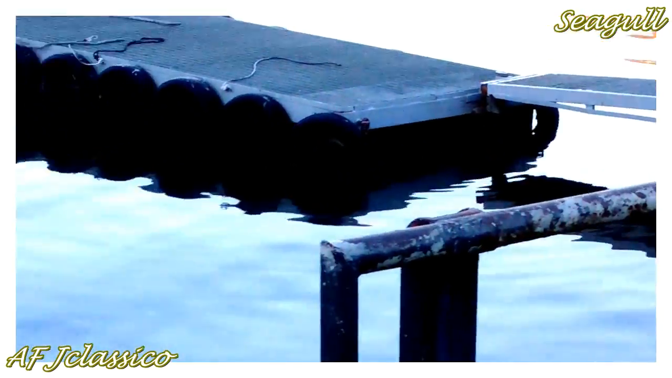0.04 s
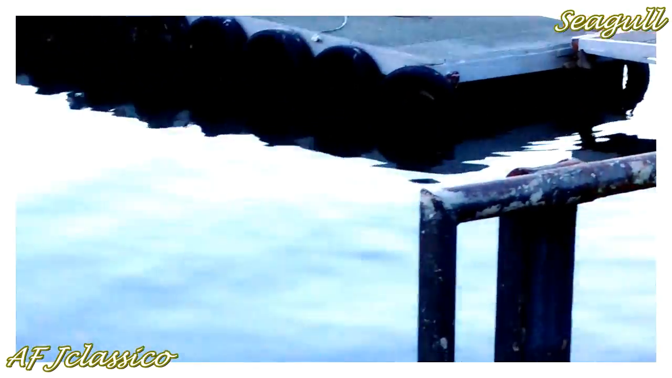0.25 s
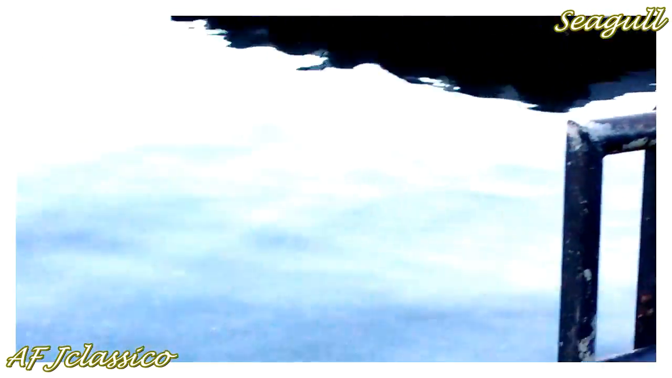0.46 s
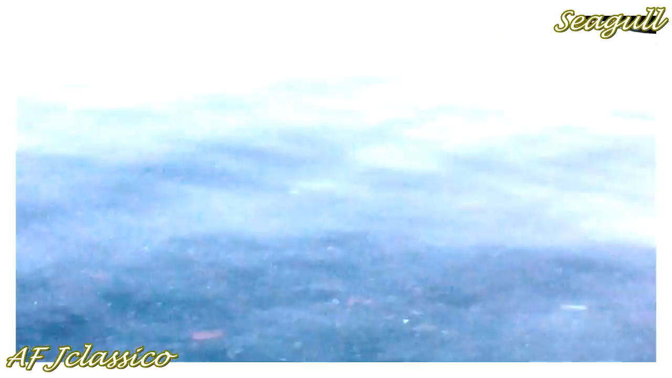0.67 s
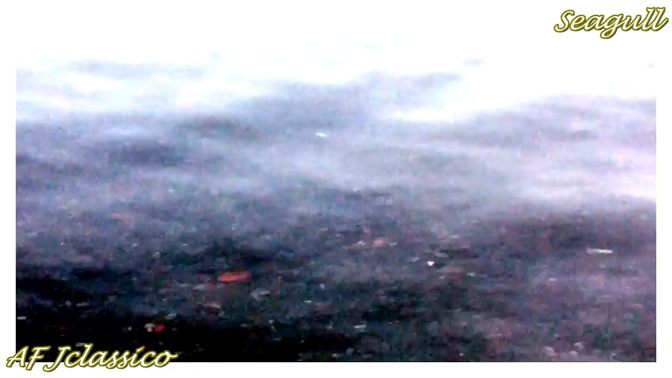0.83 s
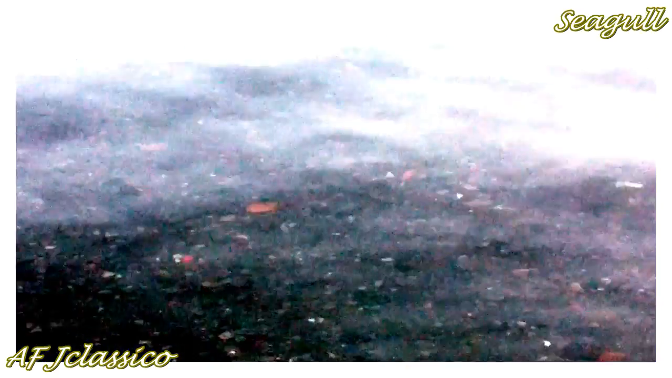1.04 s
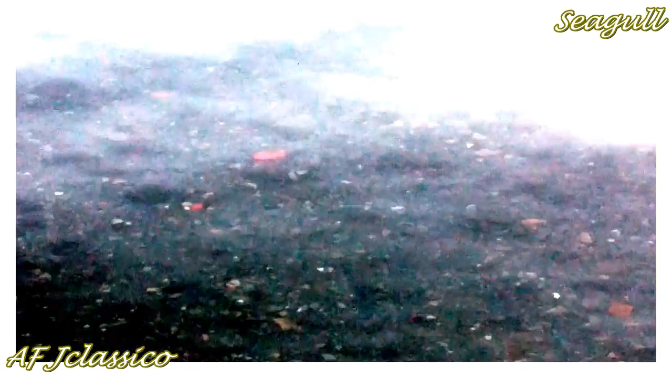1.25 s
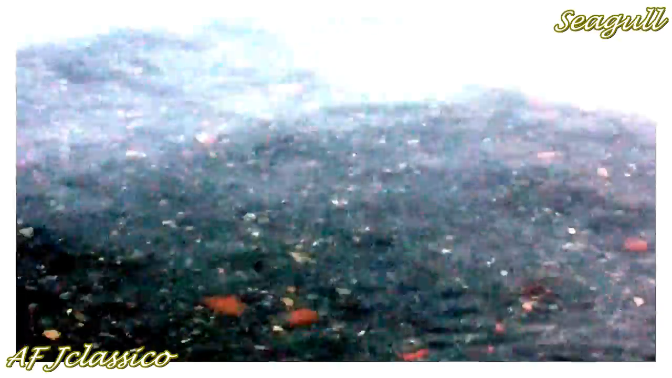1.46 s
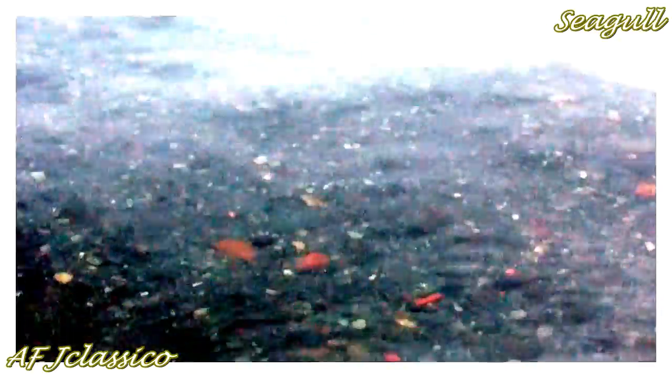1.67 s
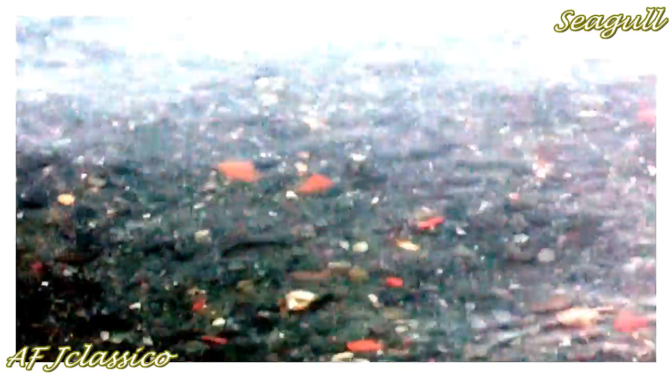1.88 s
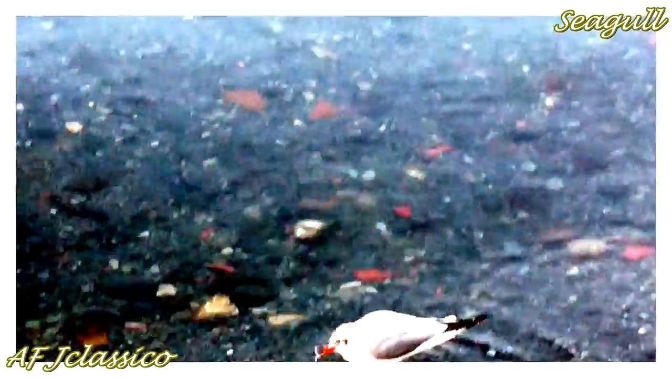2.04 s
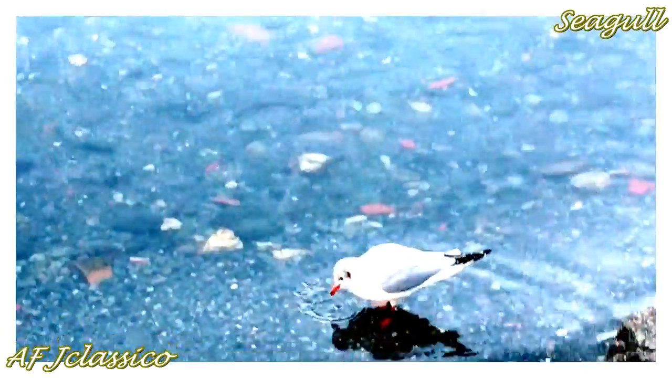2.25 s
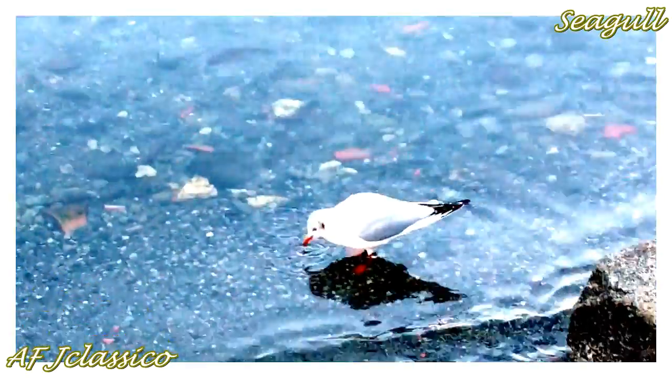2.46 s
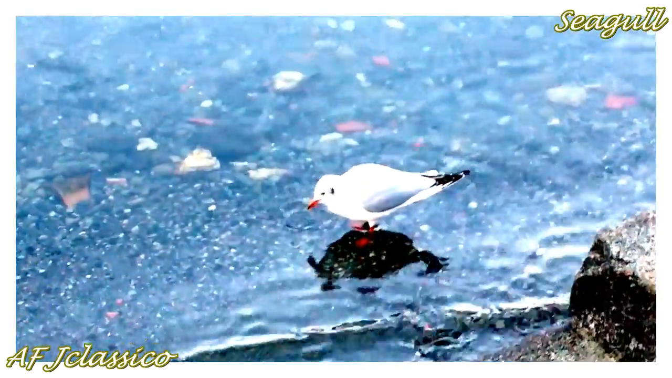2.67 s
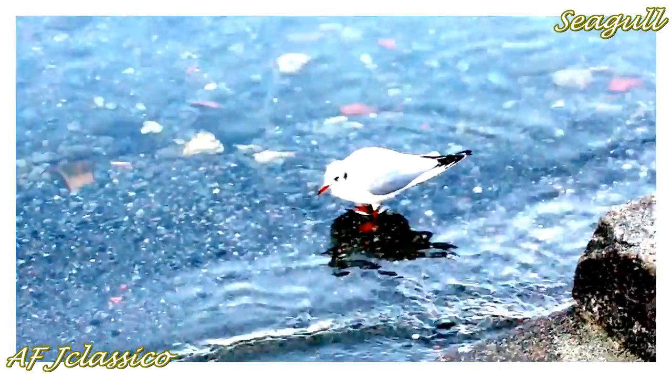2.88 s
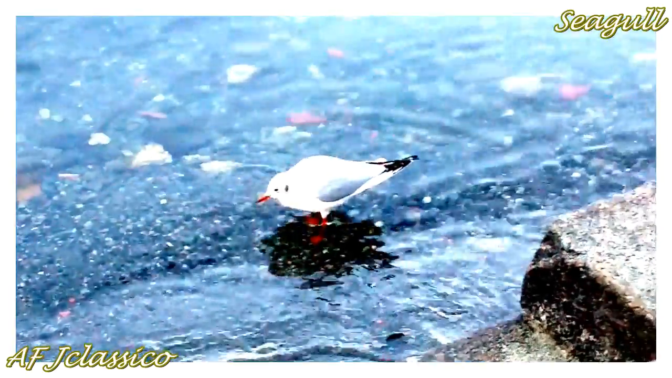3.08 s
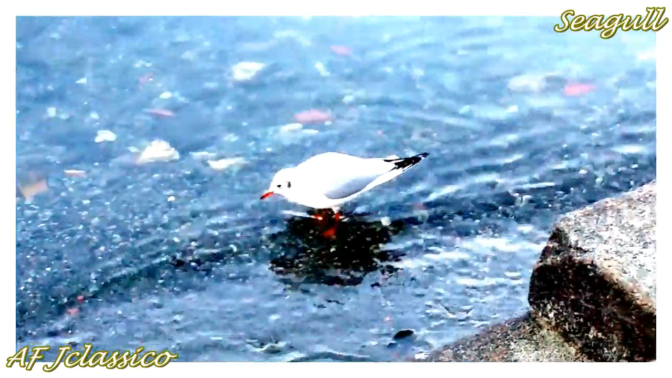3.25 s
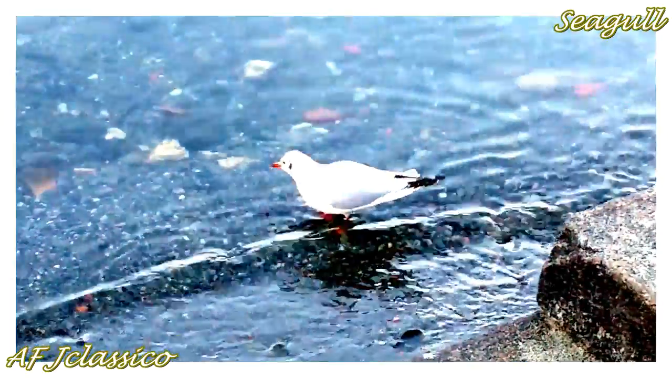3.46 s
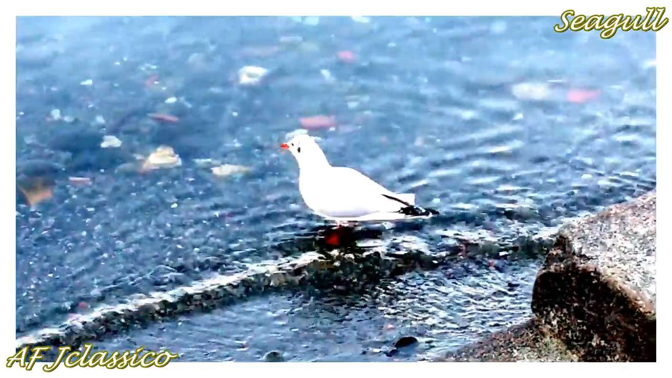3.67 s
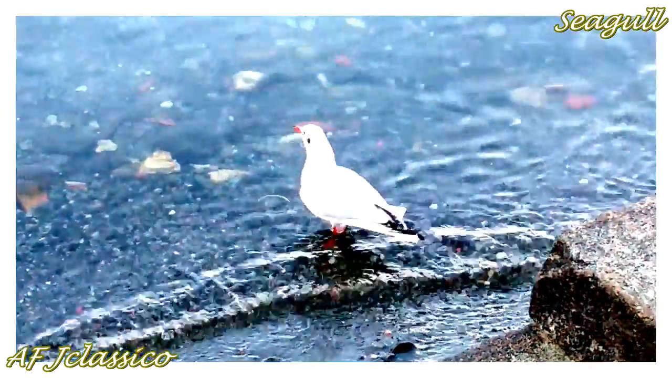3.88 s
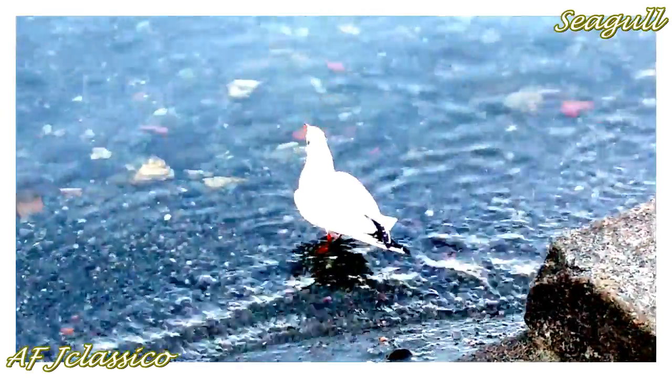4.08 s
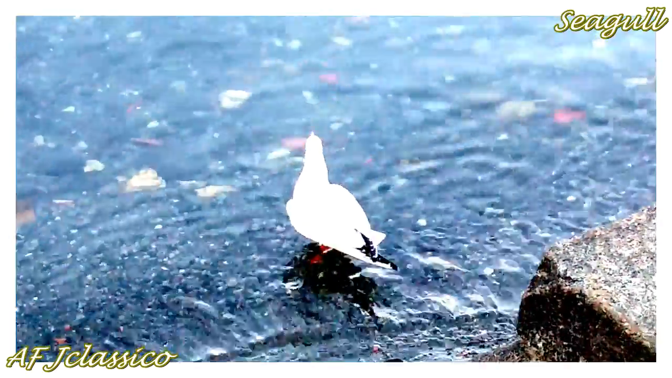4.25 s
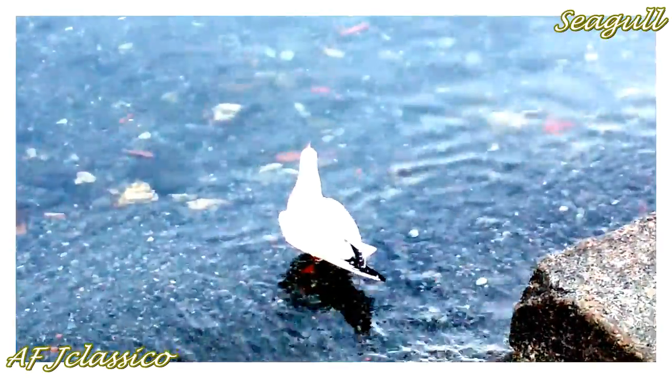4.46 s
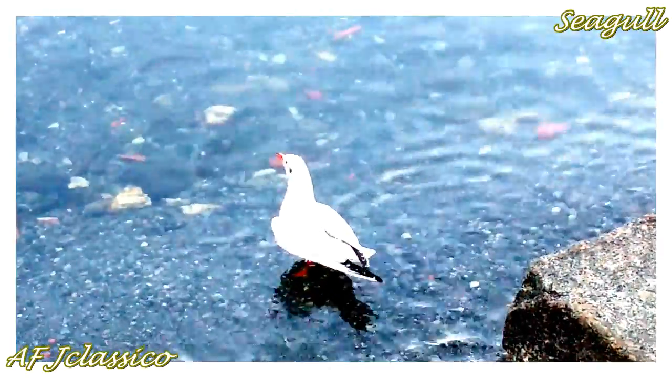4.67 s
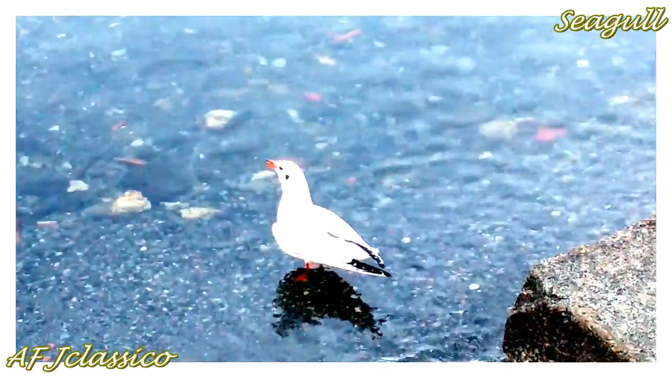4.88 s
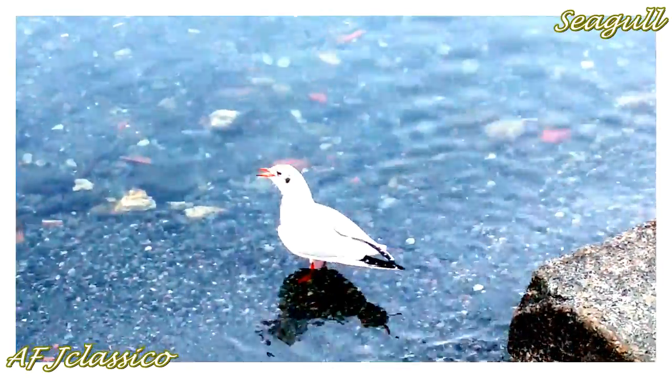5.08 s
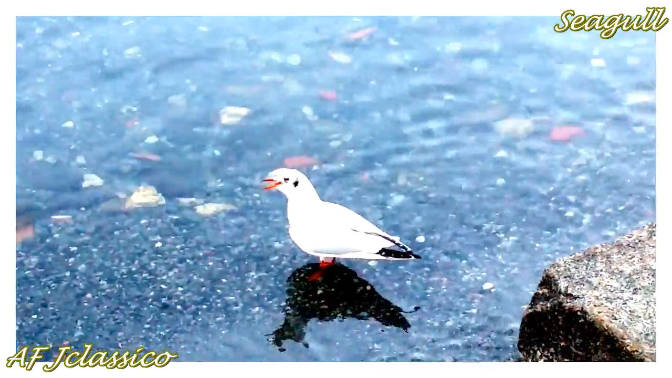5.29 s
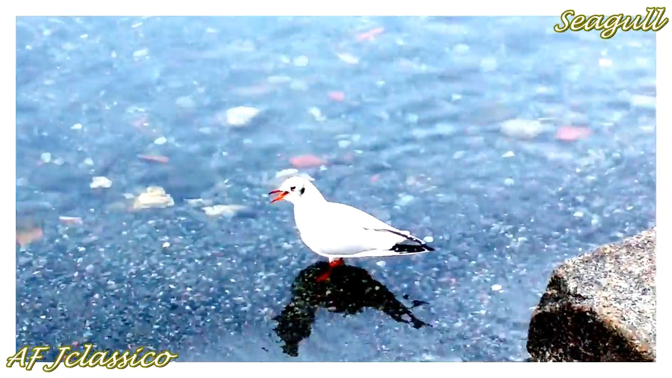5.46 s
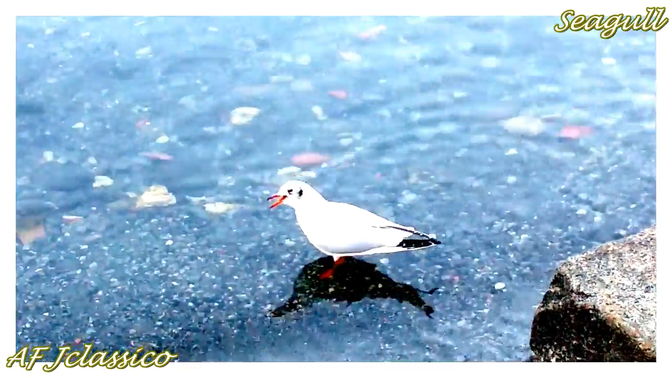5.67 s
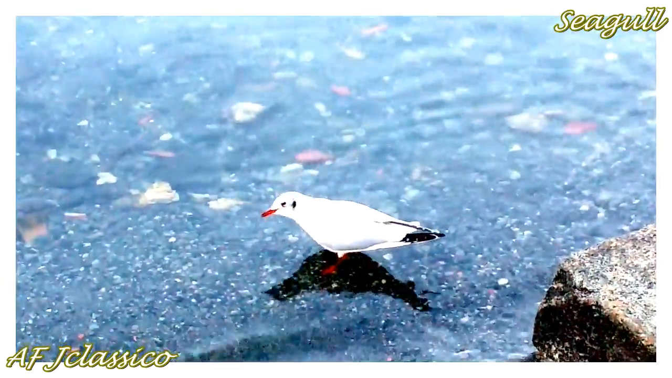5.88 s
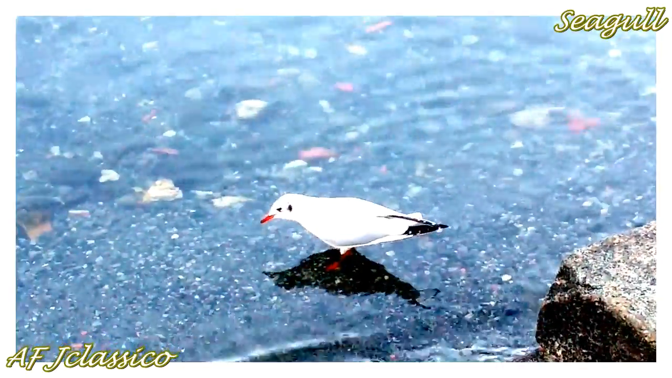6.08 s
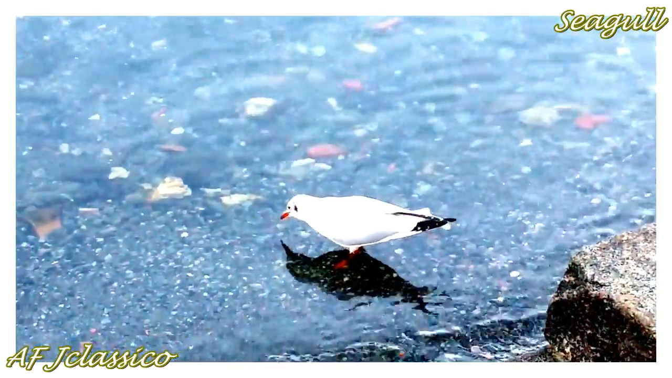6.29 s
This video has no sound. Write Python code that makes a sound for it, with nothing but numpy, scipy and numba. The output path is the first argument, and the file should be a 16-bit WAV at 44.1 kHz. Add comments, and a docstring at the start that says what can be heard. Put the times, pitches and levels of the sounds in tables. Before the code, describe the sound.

Water ticks softly on stones under a steady rush, then nearby gulls scold in a run of hoarse screeches.

```python
"""A steady rush from the far shore of a lake comes first, with water ticking and fizzing on the stones.
Then black-headed gulls scold in the shallows, close by on the right.
Each call is a rattle of about 45-105 short, hoarse bursts a second: a membrane buzzes in the voice box,
the throat rings with it, and the bill opens for the screeches.
Stones and ripples scatter the calls, and the bank answers faintly."""
import sys
import numpy as np
from scipy import signal
from scipy.fft import rfft, irfft, next_fast_len
from scipy.io import wavfile
from scipy.ndimage import uniform_filter1d
from numba import njit

SR = 44100
rng = np.random.default_rng(int(sys.argv[2]) if len(sys.argv) > 2 else 0)


def file_out(sig):
    """Save sig as 16-bit WAV at sys.argv[1]."""
    # one column per channel
    cols = np.atleast_2d(sig).T
    # limit, then scale
    lim = np.clip(cols, -1, 1)
    pcm = np.round(lim * 32767).astype(np.int16)
    wavfile.write(sys.argv[1], SR, pcm)


N = 279153

# how strong the rush is from bass to treble: f/Hz, relative level/dB
RUSH_SPECTRUM = [(13, -49), (22, -25), (58, -1.5), (68, -11), (76, 2), (86, -3), (211, -6), (242, -7.5),
                 (278, -7.5), (432, -14.5), (585, -12.5), (988, -13.5), (1300, -21), (2020, -23.5),
                 (4140, -36), (9220, -41), (16000, -41.5)]
# how alike the rush is on the left and right: f/Hz, likeness/0-1
RUSH_ALIKE = [(60, .995), (130, .985), (290, .92), (640, .75), (1400, .45), (2800, 0)]
# which side the rush leans to: f/Hz, left minus right level/dB
RUSH_BALANCE = [(60, 0.5), (180, -1.5), (550, -0.5), (1650, -5.5), (4970, 0), (15000, -1.5)]
# drops ticking on stones: t/s, peak level on the right/dB, f/Hz
DROPS = [(0.453, -36, 3550), (.538, -38, 3170), (.561, -34, 8100), (.633, -42, 8150), (.667, -43, 9200),
         (.764, -30, 8540), (1.005, -41.5, 7500), (1.171, -46, 9000), (1.244, -39, 8950),
         (1.313, -41, 8000), (1.696, -40, 6540), (3.215, -50, 8200)]
# fizz of small waves on gravel: t/s, level on the right/dB
GRAVEL_FIZZ = [(0, -64), (.3, -60), (.6, -67), (.9, -81), (1.4, -68.5), (3, -78), (6.33, -76)]
# One gull call a row. "Screech" is its shrill part, "edge" the highest part above that.
# start t/s, end t/s, attack/s, release/s, first and last burst rate/Hz, first and last pitch f/Hz,
# hoarseness/0-1, first and last throat f/Hz, first and last chest f/Hz, first and last neck factor,
# level/dB of throat, screech and edge, then the swell/dB of those three over the call
CALLS = [ (1.724, 2.195, 0.01, 0.011, 106, 76, 672.6, 630, 0.51, 2090, 1830, 1360, 1290, 1.087, 1.05, -33, -33, -40, 2.5, -2, -1.5),
         (2.172, 2.922, 0.0011, .0087, 72, 50, 621, 532, 0.62, 1790, 1670, 1230, 1070, 1.06, 1, -40, -45, -47.5, -7.5, -5.5, -21),
         (3.438, 3.51, 0.0052, 0.0033, 55, 58, 471, 506, 0.52, 2060, 2120, 630, 750, 0.97, 1.13, -44, -56.5, -61, 0, 7, 2),
         (3.504, 3.73, 0.0026, 0.041, 58.5, 76, 606.5, 651, 0.51, 1720, 2040, 780, 1240, 1.11, 0.94, -32.5, -43, -41, 8, 13, 32),
         (3.58, 4.203, 0.092, 0.0094, 90, 89.7, 590, 514.5, 0.56, 1434, 1710, 1210, 1170, 0.84, 1.084, -29, -34, -33, 12, 13.5, 5),
         (4.175, 4.38, 0.0068, 0.0098, 73, 46.4, 790, 620, 0.27, 1530, 1270, 1170, 1100, 1.05, 0.99, -23.5, -41.5, -51.5, 0, 8, 9),
         (4.358, 4.63, .003, 0.02, 96, 85, 678.6, 567, 0.64, 1500, 1640, 1180, 1120, 0.94, 1.014, -28, -16.5, -25, 1, 5, 7),
         (4.776, 4.938, 0.0032, 0.0054, 56, 67, 517, 539, 0.6, 1100, 1280, 1020, 1110, 0.98, 1.01, -36.5, -25.5, -34.5, 1.5, 1, 16),
         (4.94, 5.38, 0.039, 0.0065, 78, 85, 504, 558, 0.6, 1470, 1630, 1193, 1510, .983, 0.975, -25, -26, -27, 3.5, -4, -5),
         (5.335, 5.99, 0.017, 0.013, 87.4, 68.6, 419.7, 560.6, 0.5, 1560, 2060, 1310, 1830, .85, 1.016, -25, -30, -32.5, -8, -7, -25.5),
         (5.44, 5.825, 0.024, 0.014, 81, 67.6, 826, 530, 0.43, 2150, 1630, 1590, 1060, 0.91, 0.96, -26.5, -29.5, -55, 11.5, 0, 7),
         (5.955, 6.34, 0.0049, .002, 57, 45, 563, 596, 0.53, 1720, 1740, 1090, 1150, 1, .9, -31, -39.5, -43.5, -0.5, -6, -3),
         (5.995, 6.275, 0.026, .0089, 84, 85, 419.4, 555, 0.53, 940, 1390, 794, 1100, 1.016, 0.973, -34, -32, -35.5, 4.5, 5, 0)]
# where windpipe and bill ring in each kind of call: f/Hz at neck factor 1, width/Hz, relative level/dB
GROWL_RINGS = [(2470, 310, 4), (3880, 660, 4.5), (5080, 430, 9), (7760, 330, 12.5), (9040, 900, 17.5),
               (11200, 630, 6)]
GRUMBLE_RINGS = [(2320, 320, 5.5), (3940, 570, 8.5), (5130, 550, 2), (7740, 390, -15), (8660, 1200, 18.5),
                 (11100, 590, 10)]
RISING_RINGS = [(3570, 180, 9), (4540, 300, 18), (5800, 450, 16), (6260, 1400, 14), (8160, 600, 6),
                (9240, 570, 3.5), (11300, 540, -10)]
MOAN_RINGS = [(2700, 640, -25.5), (3700, 170, 11), (5420, 150, 13), (7800, 570, 3), (9000, 1000, -7)]
SCREAM_RINGS = [(3620, 480, 0.5), (4820, 320, 16), (5620, 520, 13.5), (6200, 600, 10.5), (8360, 850, 13.5),
                (9520, 2200, 5), (11050, 1200, -3)]
YELP_RINGS = [(2810, 690, -4), (4600, 150, -8), (5600, 640, 17), (8050, 610, 19.5), (10300, 870, 4.5)]
LONG_RINGS = [(2656, 69, 5.5), (3510, 230, -1.5), (4690, 340, 7), (5420, 320, 9.5), (5800, 350, 7),
              (7450, 230, 4.5), (9150, 320, 9.5), (14800, 530, -17.5)]
SCOLD_RINGS = [(2900, 1300, 1.7), (3580, 360, 8.7), (4570, 78, 6.9), (5210, 720, 15.4), (6240, 490, 13),
               (8950, 1030, 14.6), (12300, 1100, 1.5)]
ANSWER_RINGS = [(2640, 110, 2), (4250, 470, 6), (5400, 420, 6), (7940, 380, -4), (11700, 760, -9)]
# the bill opens wide and the call turns shrill:
# t/s, half length/s, added screech level/dB, added edge level/dB, screech rise/octaves, edge rise/octaves
BILL_OPENINGS = [(1.96, 0.078, 1.5, 8.5, -0.1, -0.026), (2.102, 0.069, 0, 9, -0.087, 0.028),
                 (3.675, 0.083, 7, 4.5, 0.071, -0.041), (3.677, 0.13, 5.5, 2.5, -0.016, 0.25),
                 (3.823, 0.043, -1.5, 3.5, -0.026, 0.051), (4.143, 0.18, 7.5, 3.5, -0.025, -0.087),
                 (4.444, 0.08, -1, 7.5, 0.086, 0.069), (4.545, 0.026, -5.5, -5, -0.041, 0.3),
                 (5.404, 0.06, 6.5, 2, 0.19, 0.069), (5.624, 0.086, 3.5, 7.5, .02, .06),
                 (5.896, 0.044, 12.5, 16, 0.024, -0.17)]
# brief loud bursts and dips in the long rattle: t/s, half length/s, added level/dB
BURSTS_AND_DIPS = [(5.048, .006, -12), (5.058, .0016, 9.5), (5.09, 0.011, -8), (5.115, .002, 6.5),
                   (5.145, 0.0027, 3), (5.166, .0015, 6), (5.182, .0015, 2)]
# the left microphone is turned away from the birds: f/Hz, added level on the left/dB
LEFT_SHADE = [(700, -12), (1300, -3.5), (1800, -12), (2400, -13.5), (3000, -5.5), (4400, -16.5),
              (5500, -22), (6600, -32), (8500, -36), (11000, -26), (15000, -6.5)]

RUSH_DB, CUTOFF_HZ = -42, 15800
REST_DB, SHRILL_DB_PER_DB = -13.5, 2.05   # effort at a call's ends; how much the shrill parts follow it
EDGE_FROM_HZ, RASP_HZ, RASP_WIDTH_HZ = 6800, 13200, 1800   # the rasp is air on top of the screech


def from_db(db):
    """Turn decibels into a number to multiply by."""
    return 10 ** (np.asarray(db) / 20)


def unit_power(x):
    """Scale a sound so its average power is 1."""
    return x / np.sqrt(np.mean(x ** 2) + 1e-20)


def at_hz(points, hz):
    """Read a table between its rows, on a musical frequency scale."""
    points = np.array(points)
    return np.interp(np.log(np.maximum(hz, 1)), np.log(points[:, 0]), points[:, 1])


def coloured(x, gain_at):
    """Turn each frequency up or down by gain_at(hz)."""
    size = next_fast_len(N + SR // 10)
    return irfft(rfft(x, size) * gain_at(np.fft.rfftfreq(size, 1 / SR)), size)[..., :N]


def drift(rate, size):
    """A random wander with about `rate` turns a second."""
    knots = rng.standard_normal(size // 4 + 2)
    return np.interp(np.arange(size) * min(rate / SR, 1 / 4), np.arange(len(knots)), knots)


def delayed(x, s):
    """The same sound, s seconds later."""
    return np.interp(np.arange(N) - round(s * SR), np.arange(N), x, left=0)


@njit
def ring_stage(x, angle, r):
    """A ringing filter: angle sets its note at each sample, r how slowly it dies away."""
    y = np.zeros(len(x))
    for i in range(2, len(x)):
        push = (1 - r * r) / 2 * (x[i] - x[i - 2])
        y[i] = push + 2 * r * np.cos(angle[i]) * y[i - 1] - r * r * y[i - 2]
    return y


def ring(x, hz, width_hz):
    """Let a sound ring around hz; two stages make the band steep-sided."""
    angle = 2 * np.pi * hz / SR * np.ones(len(x))
    r = np.exp(-np.pi * width_hz * np.sqrt(2) / SR)
    return ring_stage(ring_stage(x, angle, r), angle, r)


def rush(lead_s=0.00021):
    """The steady roar of the far shore, alike on both sides in the bass; it reaches the left first."""
    shared, apart = rng.standard_normal((2, N))
    shared = coloured(shared, lambda hz: from_db(at_hz(RUSH_SPECTRUM, hz))
                      * np.sqrt(1 + at_hz(RUSH_ALIKE, hz)))
    apart = coloured(apart, lambda hz: from_db(at_hz(RUSH_SPECTRUM, hz))
                     * np.sqrt(1 - at_hz(RUSH_ALIKE, hz)))
    pair = np.array([shared + apart, delayed(shared - apart, lead_s)])
    pair = coloured(pair, lambda hz: from_db(at_hz(RUSH_BALANCE, hz) * np.array([[.5], [-.5]])))
    return from_db(RUSH_DB) * unit_power(pair)


def water(tick_decay_s=0.013, tick_width_hz=2600, left_db=-8):
    """Single drops tick on stone while small waves fizz on gravel."""
    t, out = np.arange(N) / SR, np.zeros(N)
    age = t[:SR // 20]
    for s, peak_db, hz in DROPS:
        splash = rng.standard_normal(len(age)) * from_db(-60 * age / tick_decay_s)
        tick = ring(splash, hz, tick_width_hz)
        at = int(s * SR)
        out[at:at + len(age)] += from_db(peak_db) * tick / np.abs(tick).max()
    grains = rng.standard_normal(N) * from_db(3.5 * drift(310, N))
    fizz_db = np.interp(t, *np.transpose(GRAVEL_FIZZ))
    out += from_db(fizz_db) * unit_power(ring(grains, hz=8700, width_hz=3200))
    return out * from_db([[left_db], [0]])


def voice_box(t, pitch, hoarse, burst):
    """A buzzing membrane starts afresh in every burst; it shakes and hisses more when hoarse."""
    hoarse = np.clip(hoarse, 0, .6)
    shake = .14 * rng.standard_normal(500)[burst] + .17 * drift(900, len(t))
    pitch = pitch * (1 + hoarse ** 2 * shake)
    cycles = np.cumsum(pitch) / SR
    cycles = cycles - cycles[np.searchsorted(burst, burst)]
    # each time the membrane shuts it clicks; the click is shared between two samples
    shuts = np.flatnonzero(np.diff(np.floor(cycles)) > 0)
    late = (np.ceil(cycles[shuts]) - cycles[shuts]) * SR / pitch[shuts]
    strength = np.exp(hoarse * rng.standard_normal(len(shuts)) / 2)
    clicks = np.zeros(len(t))
    clicks[shuts], clicks[shuts + 1] = strength * (1 - late), strength * late
    hiss = rng.standard_normal(len(t)) * (1 + np.cos(2 * np.pi * cycles) / 2)
    return unit_power(windpipe(clicks)) + hoarse * unit_power(hiss)


def windpipe(x):
    """Echoes up and down the windpipe smear every click over a few milliseconds."""
    for lag in (11, 19, 31):   # samples
        taps = np.zeros(lag + 1)
        taps[0], taps[lag] = 1, 1 / 2
        x = signal.lfilter(taps[::-1], taps, x)
    return x


def evened(x):
    """Hold the power near 1 over a few bursts, keeping the rattle."""
    size = SR // 40
    return x / np.sqrt(uniform_filter1d(uniform_filter1d(x ** 2, size), size) + 1e-12)


def loudness(t, start, end, attack_s, release_s, levels_db, swells_db):
    """Throat, screech and edge in dB: effort rises, holds and lets go; an open bill shifts the top two."""
    effort = REST_DB * (np.exp(-np.abs(t - start) / attack_s) + np.exp(-np.abs(end - t) / release_s))
    from_middle = (t - start) / (end - start) - .5
    throat, screech, edge = [db + swell * from_middle for db, swell in zip(levels_db, swells_db)]
    screech_lift, edge_lift, *_ = bill_opening(t)
    shrill_effort = SHRILL_DB_PER_DB * effort
    return throat + effort, screech + screech_lift + shrill_effort, edge + edge_lift + shrill_effort


def bill_opening(t):
    """The bill opens and shuts smoothly: added dB of screech and edge, then their rises in octaves."""
    return sum(np.outer(effects, np.exp(-((t - s) / half_s) ** 2))
               for s, half_s, *effects in BILL_OPENINGS)


def bill(buzz, rings, neck, rises, air_db):
    """Windpipe and bill ring to make the screech and its edge; a larger neck factor raises their pitch."""
    bands = np.zeros((2, len(buzz)))
    for hz, width_hz, level_db in rings:
        band = int(hz > EDGE_FROM_HZ)
        bands[band] += from_db(level_db) * ring(buzz, hz * neck * 2 ** rises[band], width_hz)
    air = from_db(air_db) * evened(ring(buzz, RASP_HZ, RASP_WIDTH_HZ))
    return evened(bands[0]) + air, evened(bands[1])


def water_echo(x, lag_s=0.000921, sway=0.053, sway_hz=7, share=0.27):
    """The water throws the shrill sound back a moment later; the delay wanders as the head sways."""
    samples = np.arange(len(x))
    lag = lag_s * SR * (1 + sway * drift(sway_hz, len(x)))
    return x + share * np.interp(samples - lag, samples, x)


def bursts_and_dips(t):
    """The gain that gives the long rattle its brief loud bursts and dips."""
    return from_db(sum(db * np.exp(-((t - s) / half_s) ** 2) for s, half_s, db in BURSTS_AND_DIPS))


def call(row, rings, throat_width_hz, glide, arch, throat_close, bill_close, chest_db,
         chest_width_hz=220, chest_swell_db=0, base_note_db=-30, air_db=-31, jitter=.025, split=0,
         throat_follows=0.86, bill_follows=0.35, bill_leak=0.4, clear=0,
         bow_octaves=0, slide_octaves=0, slide_s=.1, fade_s=0.0012, uneven_db=0.5):
    """One call: bursts of buzz from the voice box ring in the throat, chest and bill."""
    start, end, attack_s, release_s = row[:4]
    hoarse, levels_db, swells_db = row[8], row[15:18], row[18:]
    span = np.arange(int(start * SR), min(int(end * SR), N))
    t = span / SR
    progress = (t - start) / (end - start)
    # each setting glides from its first to its last value; the voice may bow upward on the way
    pairs = row[4:6], row[6:8], row[9:11], row[11:13], row[13:15]
    rate, pitch, throat_hz, chest_hz, neck = [first * (last / first) ** progress for first, last in pairs]
    bow = 2 ** (bow_octaves * np.sin(np.pi * progress))
    pitch, throat_hz, chest_hz = pitch * bow, throat_hz * bow, chest_hz * bow
    count = np.cumsum(rate * (1 + jitter * drift(70, len(t)))) / SR
    within, burst = count % 1, count.astype(int)
    # the pitch slides and arches in every burst, and pulls the ringing along
    bend = glide * (within - .5) + arch * (np.sin(np.pi * within) - np.pi / 4)
    strength = from_db(uneven_db * rng.standard_normal(500)[burst])
    tone = strength * voice_box(t, pitch * (1 + bend), hoarse * (1 - clear), burst)
    rasp = strength * voice_box(t, pitch * (1 + bend), hoarse, burst)
    pulse = np.sin(np.pi * within ** 0.38) ** 2 + 1e-9
    # with `split`, a wide-open bill chokes the top of each burst, breaking it in two
    _, opening_db, screech_rise, edge_rise = bill_opening(t)
    choke = 1 - np.clip(split * opening_db, 0, .9) * pulse ** 6
    # a bigger `close` makes each burst shorter
    low_buzz = tone * (0.25 + pulse ** throat_close)
    high_buzz = water_echo(rasp * (bill_leak + pulse ** bill_close) * choke)
    # the throat picks out one or two overtones; the chest and a faint base note add body
    pull = 1 + throat_follows * bend
    chest_gain = from_db(chest_db + chest_swell_db * (progress - .5))
    throat = evened(ring(low_buzz, throat_hz * pull, throat_width_hz))
    throat += chest_gain * evened(ring(low_buzz, chest_hz * pull, chest_width_hz))
    throat += from_db(base_note_db) * evened(ring(low_buzz, pitch, width_hz=200))
    # the screech may start high and slide down
    screech_rise = screech_rise + slide_octaves * np.exp(-((t - start) / slide_s) ** 2)
    neck = neck * (1 + bill_follows * bend)
    screech, edge = bill(high_buzz, rings, neck, (screech_rise, edge_rise), air_db)
    throat_db, screech_db, edge_db = loudness(t, start, end, attack_s, release_s, levels_db, swells_db)
    voice = from_db(throat_db) * throat * bursts_and_dips(t)
    voice += from_db(screech_db) * screech + from_db(edge_db) * edge
    out = np.zeros(N)
    out[span] = voice * np.clip(np.minimum(t - start, end - t) / fade_s, 0, 1)
    return out


def gulls():
    """The gulls' calls, in three groups; their small throats give out little of the base note."""
    (growl, grumble, creak, croak, rising, moan, scream, yelp,
     long_rattle, scolding, wail, mutter, answer) = CALLS
    growls = call(growl, GROWL_RINGS, 380, glide=.092, arch=.033, throat_close=3.5, bill_close=2.4,
                  chest_db=0, air_db=-40, jitter=.011, bill_leak=.15, throat_follows=.3)
    growls += call(grumble, GRUMBLE_RINGS, 440, glide=.063, arch=.051, throat_close=3.5, bill_close=1.4,
                   chest_db=1, air_db=-26, slide_octaves=.18, slide_s=.28, bill_leak=.16)
    growls += call(wail, MOAN_RINGS, 260, glide=.27, arch=.036, throat_close=.56, bill_close=.55,
                   chest_db=-1.5, chest_swell_db=-33, base_note_db=-13, throat_follows=.99, clear=.26)
    scolds = call(creak, RISING_RINGS, 550, glide=.21, arch=.05, throat_close=1.4, bill_close=1,
                  chest_db=4.5, chest_width_hz=85)
    scolds += call(croak, RISING_RINGS, 450, glide=.16, arch=.11, throat_close=1.8, bill_close=.47,
                   chest_db=-5, chest_width_hz=99, air_db=-16, jitter=.013, bow_octaves=.048)
    screams = call(rising, RISING_RINGS, 400, glide=.25, arch=.2, throat_close=.7, bill_close=1.5,
                   chest_db=-4.5, chest_swell_db=-10, chest_width_hz=330, air_db=-23,
                   throat_follows=.8, bill_follows=.14, bill_leak=.14, clear=.25)
    scolds += call(moan, MOAN_RINGS, 220, glide=.31, arch=.021, throat_close=.38, bill_close=.62,
                   chest_db=-22, throat_follows=.67)
    screams += call(scream, SCREAM_RINGS, 540, glide=-.12, arch=.16, throat_close=.27, bill_close=1,
                    chest_db=-11, air_db=-22, split=.14, jitter=.004, slide_octaves=.22, slide_s=.07,
                    bill_leak=.16)
    scolds += call(yelp, YELP_RINGS, 1150, glide=.25, arch=.12, throat_close=.43, bill_close=1.1,
                   chest_db=1.5, chest_width_hz=330, air_db=-25, bill_follows=.2, bill_leak=.18)
    screams += call(long_rattle, LONG_RINGS, 330, glide=-.293, arch=.1795, throat_close=1.5,
                    bill_close=.42, chest_db=-8.5, chest_width_hz=320, chest_swell_db=-21, air_db=-46,
                    jitter=.04, throat_follows=.71, bill_follows=.28, clear=.25)
    scolds += call(scolding, SCOLD_RINGS, 400, glide=-.25, arch=.14, throat_close=1.3, bill_close=1.3,
                   chest_db=-9, chest_swell_db=9, chest_width_hz=280, air_db=-24, jitter=.012,
                   throat_follows=.85, bill_follows=.25, bill_leak=.14, clear=.25)
    scolds += call(mutter, SCOLD_RINGS, 690, glide=-.15, arch=.05, throat_close=2.6, bill_close=.7,
                   chest_db=-22, jitter=.012)
    screams += call(answer, ANSWER_RINGS, 250, glide=.44, arch=.12, throat_close=1, bill_close=.8,
                    chest_db=0, chest_width_hz=160, air_db=-28, throat_follows=.66, bill_follows=.33,
                    bow_octaves=.22, clear=.3)
    bass_cut = signal.butter(3, 740, "high", fs=SR, output="sos")
    return signal.sosfilt(bass_cut, [growls, scolds, screams])


def shore(x, lead_s, left_db, left_treble_db, left_scatter_db=-5, right_scatter_db=-15,
          bank_db=-29, bank_decay_s=0.91, scatter_decay_s=.09, ripple_hz=9):
    """Stones and ripples scatter a call and the bank answers; the shaded left has more of the scatter."""
    t = np.arange(SR // 2) / SR
    near = unit_power(rng.standard_normal((3, len(t))) * from_db(-60 * t / scatter_decay_s) * (t > .002))
    far = unit_power(rng.standard_normal((2, len(t))) * from_db(-60 * t / bank_decay_s) * (t > .02))
    echoes = np.vstack([near, far]) / np.sqrt(len(t))
    crest, trough, stones, *bank = signal.fftconvolve(x[None], echoes, axes=1)[:, :N]
    turn = np.pi * drift(ripple_hz, N)
    ripples = crest * np.cos(turn) + trough * np.sin(turn)
    left = x + from_db(left_scatter_db) * ripples + from_db(bank_db) * bank[0]
    right = delayed(x, lead_s) + from_db(right_scatter_db) * stones + from_db(bank_db) * bank[1]
    tilt = [(1200, left_db), (5000, left_treble_db)]
    left = coloured(left, lambda hz: from_db(at_hz(tilt, hz) + at_hz(LEFT_SHADE, hz)))
    return np.array([left, right])


def scene():
    """Far rush, water on stones and gulls close by; each group of calls has its own left-right balance."""
    growls, scolds, screams = gulls()
    birds = shore(growls, lead_s=0.00043, left_db=-3.5, left_treble_db=5.5)
    birds += shore(scolds, lead_s=0.00045, left_db=5.0, left_treble_db=4.5)
    birds += shore(screams, lead_s=0.00002, left_db=-1.5, left_treble_db=-1.5, left_scatter_db=8.0)
    return birds + water() + rush()


def record(dry):
    """The very highest treble is cut off steeply."""
    return signal.sosfilt(signal.ellip(10, .1, 80, CUTOFF_HZ, fs=SR, output="sos"), dry)


dry = scene()
out = record(dry)
file_out(out)
```